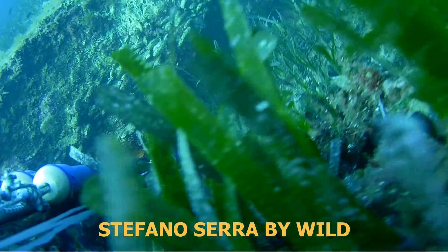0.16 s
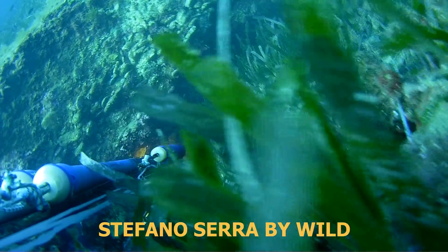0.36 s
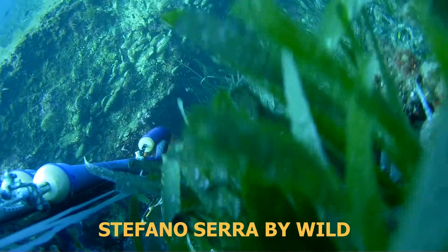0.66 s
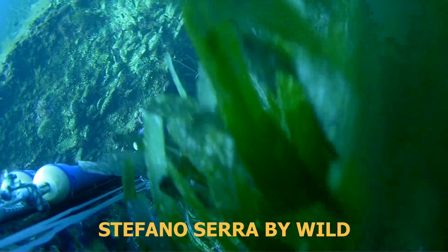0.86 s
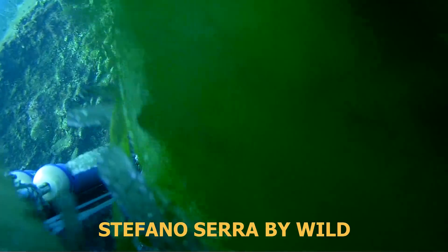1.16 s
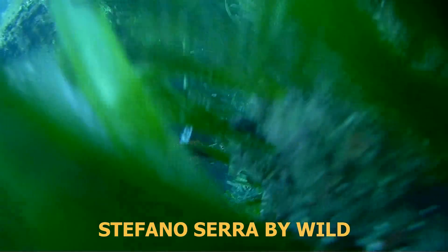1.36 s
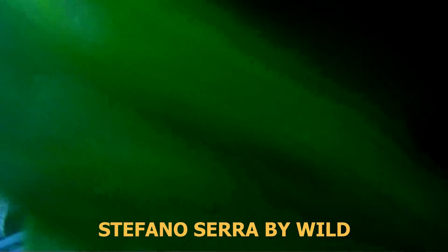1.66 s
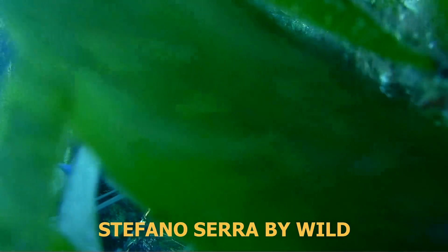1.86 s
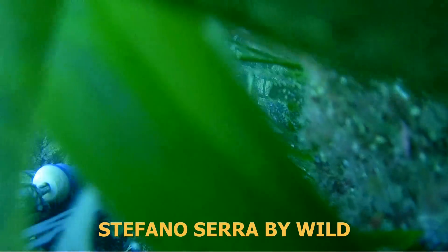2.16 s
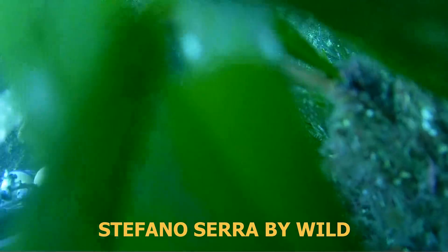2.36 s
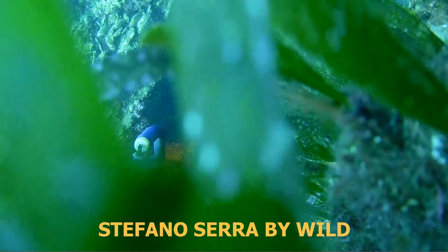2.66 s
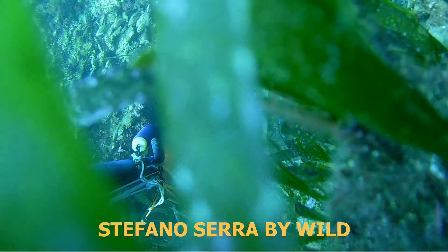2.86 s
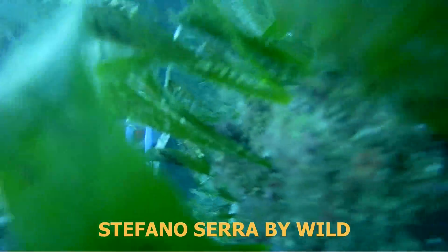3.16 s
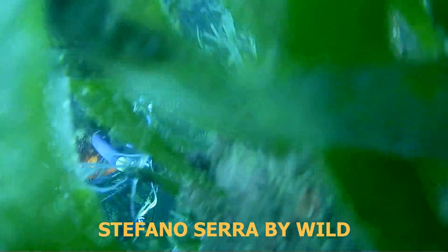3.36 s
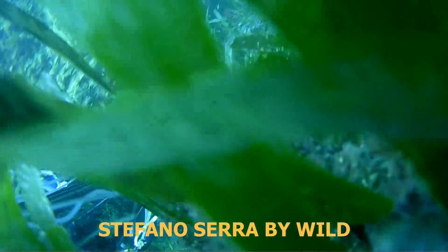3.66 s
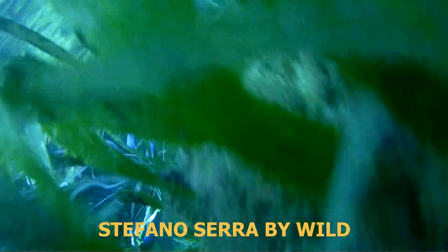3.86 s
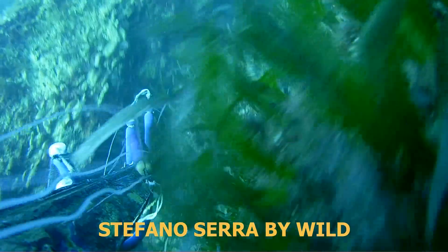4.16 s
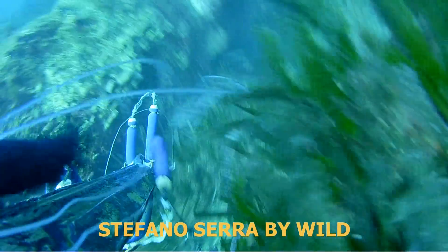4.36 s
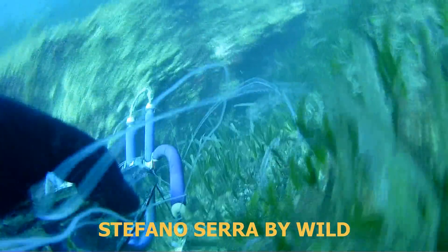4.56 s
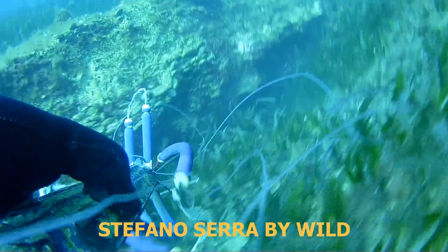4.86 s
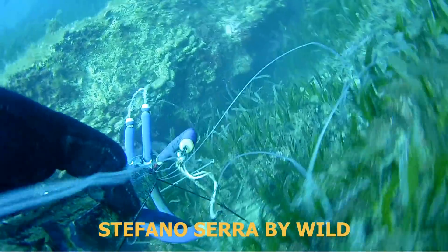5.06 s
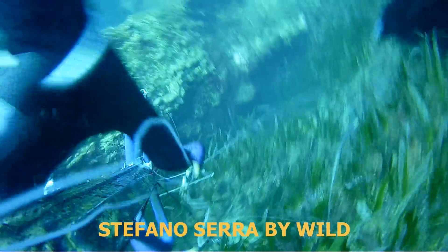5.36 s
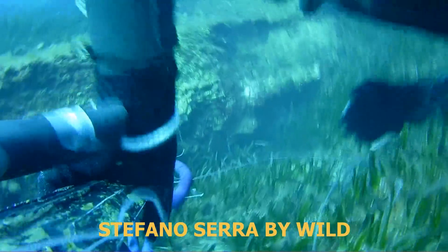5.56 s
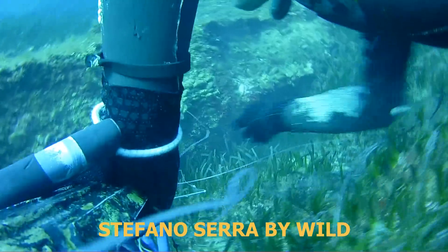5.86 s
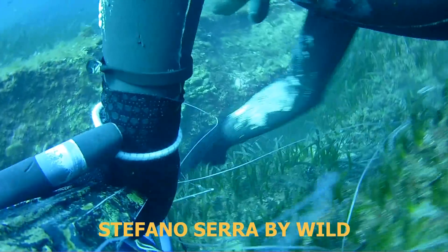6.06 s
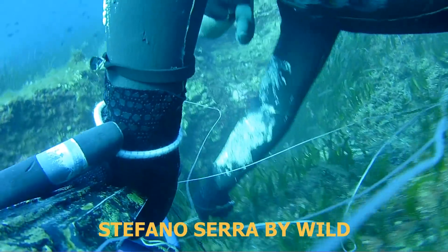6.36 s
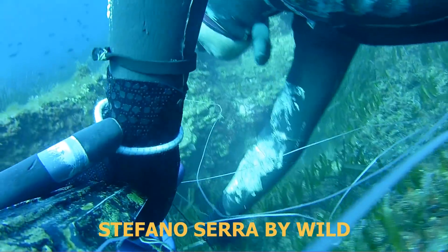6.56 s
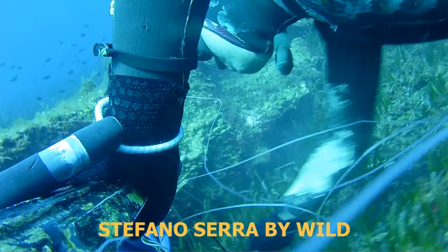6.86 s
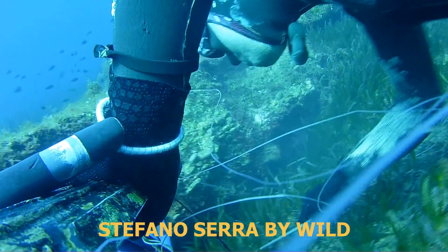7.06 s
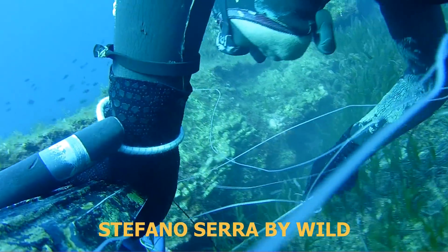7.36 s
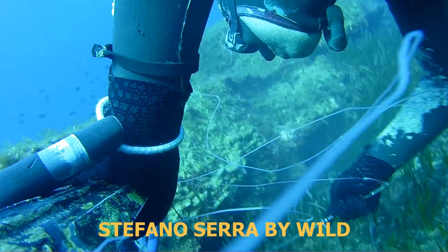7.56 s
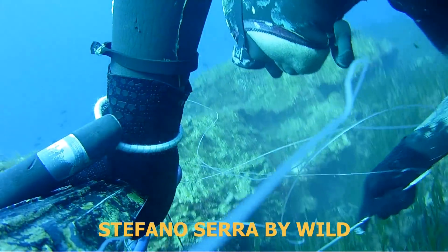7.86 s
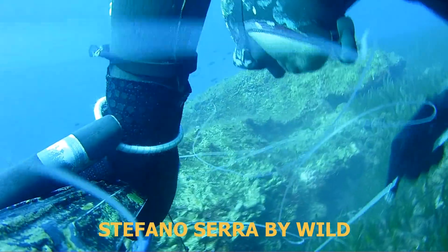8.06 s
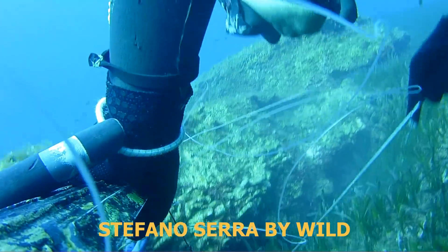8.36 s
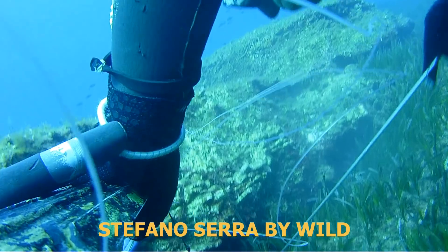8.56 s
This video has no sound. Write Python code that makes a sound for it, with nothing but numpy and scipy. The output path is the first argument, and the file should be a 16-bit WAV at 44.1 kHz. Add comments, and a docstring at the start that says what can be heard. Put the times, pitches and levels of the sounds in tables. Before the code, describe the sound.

Close, muffled, contact-like underwater sound with no room echo. Blades of grass brush and flick lightly against the housing, then near-silence before a sudden overloaded speargun crack, buzzing and metallic for a tenth of a second. Rubber bands bounce in a fading rattle. The gear is then handled with line scrapes, glove rubs, dull thuds and sharp clacks, settling into quiet hiss with sparse soft taps.

```python
"""A speargun fires under water: hard blows, a juddering scrape and recoil overload the microphone of a camera
that rides on the gun in a sealed housing. Contacts ring damped modes and excite short noise bursts; friction
is a filtered train of slips. Before the shot, seagrass rustles and flicks as the gun is pushed through it;
afterwards bands and line rattle out and the gear knocks and rubs as it is handled, over a steady hiss."""
import sys
import numpy as np
from scipy import signal
from scipy.io import wavfile

SR = 44100
rng = np.random.default_rng(int(sys.argv[2]) if len(sys.argv) > 2 else 0)


def waveform_to_disk(signal):
    """Save audio, clipped to [-1, 1], as 16-bit WAV at the path in sys.argv[1]."""
    frames = np.transpose(np.atleast_2d(signal))
    scaled = np.clip(frames, -1, 1) * 32767
    samples = np.round(scaled).astype(np.int16)
    wavfile.write(sys.argv[1], SR, samples)


N = 383669
TIME = np.arange(N) / SR

# trigger, band release and the shaft's tail leaving the muzzle: t/s, level/dB, weight/0-1, hardness/0-1
SHOT_BLOWS = [(2.9884, -3, .45, .85), (2.9906, -6.5, .4, .9), (2.9969, 2.5, .05, .82),
              (3.0027, -13, 0.3, .85), (3.112, -19.5, 0.4, .55)]
# slack bands bouncing on the gun: t/s
BAND_BOUNCES = [3.1244, 3.1284, 3.1457, 3.151, 3.1566, 3.1861, 3.1931, 3.2218, 3.269, 3.2844, 3.2903, 3.312,
                3.3212, 3.334, 3.3644, 3.4206, 3.4386, 3.5035, 3.5165, 3.6049]
# steel shaft pinging: t/s, f/Hz, level/dB, t60/s
SHAFT_PINGS = [(2.9968, 11450, -10.5, .025), (3.0025, 12000, -18.5, .012), (3.02, 5500, -7.5, .025),
               (3.2075, 5250, -37, .016)]
# shaft, line and hands hitting the gun: t/s, level/dB, weight/0-1, hardness/0-1
GEAR_KNOCKS = [(3.1639, -21.5, 0.3, 0.79), (3.2035, -35.5, .2, 1), (3.985, -42, .55, 0.2),
               (4.1046, -40, 0.7, 0.14), (4.1278, -41, 0.2, 0.92), (4.2521, -43.5, 0.55, 0.94),
               (4.479, -36, 0.35, .1), (4.5193, -37.5, 0.6, .05), (4.5488, -40, 0.93, 0.3),
               (4.6033, -24.5, 1, 0.4), (4.6052, -21, 0.43, 0.66), (4.6127, -16, 0.77, 0.64),
               (4.6293, -15.5, 0, 0.82), (4.6379, -21, 0.57, 0.6), (4.6476, -21, 0.65, 0.42),
               (4.6569, -25, 0.62, .35), (4.719, -30.5, 0.1, 0.71), (4.7261, -32, 0.46, 0.77),
               (4.7381, -40, .5, 0.88), (4.814, -28, 0.68, 0), (4.8233, -30.5, 0.46, 0.1),
               (4.8994, -37, 0, 0.1), (5.1934, -38, .35, 0), (5.3074, -47.5, 0.44, 1),
               (5.3324, -57, 0.8, 1), (5.4541, -12.5, 0.9, 0.6), (5.4574, -12, 0.92, 0.88),
               (5.4768, -14.5, .45, 0.6), (5.4839, -18.5, 0.6, 0.72), (5.5074, -30.5, 0.6, 0.3),
               (5.5666, -34, 0.3, 0.3), (5.5925, -36, 0.2, .05), (5.629, -28, 0, 0.24),
               (5.6748, -33.5, 0.67, 0), (5.6822, -31.5, 0.3, 0), (5.7067, -29, 0.63, 0),
               (5.7387, -28.5, 0, 0.36), (5.8012, -14, 0.3, 0), (5.803, -11, 0.12, 0.45),
               (5.8065, -16, 0.69, .3), (5.8291, -21, 0.47, 0.4), (5.8474, -30, 0.04, .05),
               (5.8567, -27, 0.13, .02), (5.9824, -25.5, 0.46, 0.7), (7.53, -50, .25, .35),
               (7.578, -51, .5, 1), (7.62, -53, 0.2, .8), (7.7809, -45, .5, .1), (7.8029, -38, 0.24, 0.3),
               (7.9239, -51.5, 1, 1), (7.9575, -42, .6, 0.16), (8.0571, -41, .3, 0.97),
               (8.154, -41.5, 0.4, 0.5), (8.2838, -37.5, 0.42, 0.3), (8.3671, -52.5, .5, 0.88),
               (8.664, -52, .4, 0.7)]
# low tones of heavy bumps on the gun: t/s, f/Hz, level/dB, t60/s
HEAVY_BUMPS = [(4.6035, 320, -19.5, 0.036), (4.606, 118, -23, .2), (4.657, 130, -38.5, 0.056),
               (5.4545, 306, -9.5, 0.044), (5.456, 126, -22.5, 0.14), (5.8012, 120, -27.5, 0.29),
               (5.802, 246, -25, 0.1), (5.982, 59.5, -35, 0.092)]
# glove and line rubbing along the gun: t/s, level/dB; its spectrum: f/Hz, level/dB
RUB_LEVEL = [(3.6, -64.5), (4.28, -53.5), (4.41, -62.5), (4.55, -47), (4.81, -47.5), (4.92, -60),
             (5.24, -51.5), (5.42, -58), (5.6, -45), (6.02, -53), (6.15, -61.5), (6.35, -60.5), (6.5, -75),
             (7.35, -74), (7.55, -62.5), (8.14, -58), (8.26, -73), (8.7, -57)]
RUB_SPECTRUM = [(200, -22.5), (420, -13.5), (540, -3.5), (640, -8), (740, 2), (850, -10), (1200, -17),
                (1560, -7), (1850, -16), (2300, -25), (2900, -23.5), (3280, -16), (4000, -36.5),
                (7000, -41), (15000, -61)]
# short drags of the line over the gun: middle t/s, length/s, level/dB; their spectrum: f/Hz, level/dB
LINE_DRAGS = [(3.151, 0.063, -41), (4.199, 0.038, -48.5), (4.234, 0.043, -50.5), (4.71, 0.11, -46.5),
              (5.316, 0.05, -60), (5.739, 0.0062, -31), (5.96, 0.021, -50.5), (5.984, 0.015, -49),
              (6.033, 0.036, -47), (7.64, 0.021, -53), (8.427, 0.051, -47)]
DRAG_SPECTRUM = [(400, -6.5), (780, 13.5), (1200, -6), (2000, 4), (2600, -5), (3400, 1.5), (5200, -19),
                 (7000, -11.5), (9500, -18), (15000, -25)]
# shoves that set the gun swaying in the hand: t/s, level/dB; the sway's spectrum: f/Hz, level/dB
HAND_SHOVES = [(1.44, -53), (3.02, -27), (3.12, -40), (3.185, -40), (3.31, -40), (3.41, -49),
               (4.625, -30.5), (5.35, -47), (5.475, -35), (5.82, -48), (5.99, -36.5)]
SWAY_SPECTRUM = [(15, -3), (42, 3.5), (65, -8), (115, -8.5), (190, -25), (600, -69)]
# strongest seagrass blades flicking the housing: t/s, level/dB, weight/0-1, hardness/0-1
BLADE_FLICKS = [(.9511, -44, .65, 0.6), (.995, -45.5, 0.1, 0.4), (1.11, -49, 0.6, 0.8),
                (1.14, -47, 0.4, .35), (1.2087, -48, 0.3, 0.94), (1.2702, -41, 0.4, 0.42),
                (1.3138, -45, 0.3, 0.75), (1.3493, -48, .3, .9), (1.3713, -37, 0.67, 0.95),
                (1.4019, -49, 0.68, 1), (1.4122, -38.5, 0.54, 0.87), (1.4763, -47, .55, 0.97),
                (1.5178, -41, 0.2, 0.74), (1.554, -45, .75, 0.7)]
# seagrass pressing past the housing: t/s, level/dB; its spectrum: f/Hz, level/dB
GRASS_LEVEL = [(.87, -73.5), (.97, -64.5), (1.26, -60.5), (1.39, -48), (1.45, -54.5), (1.51, -52),
               (1.62, -59), (1.76, -58.5), (2.15, -74)]
GRASS_SPECTRUM = [(300, -27), (600, -19.5), (780, 6.5), (1000, -9), (1300, -6), (1590, -3), (1850, -19),
                  (2500, -21), (3000, -11), (3800, -29), (4300, -16.5), (5400, -32), (7000, -22.5),
                  (9800, -31), (12000, -31), (16000, -54.5)]
# spectrum of the camera's hiss: f/Hz, relative level/dB
HISS_SPECTRUM = [(12, -30.5), (20, -3), (44, 0.5), (81, -2), (192, 0), (308, -2), (419, -3), (570, -5.5),
                 (620, -4.5), (819, -8.5), (916, -9.5), (1280, -13), (2960, -22.5), (13400, -33),
                 (15800, -33)]

# nominal modes of gun and housing, varied from blow to blow: f/Hz, level/dB, t60/s
HOUSING_MODES = [(40, -15, 0.56), (85.5, -8.5, 0.11), (120, -5, 0.11), (251, -6, 0.08), (320, 0, .04),
                 (523, -5.5, 0.036), (697, -1.5, 0.081), (731.7, -1.5, 0.063), (942, -11, 0.046),
                 (1180, -13, .02), (1400, -5, .025), (1543, 1, 0.031), (1649, -1, 0.025), (1925, -8, 0.023),
                 (2430, -7.5, 0.012), (2950, -6, 0.023), (3320, 0, .016), (4300, -9, 0.0069)]
# boundaries between the thud, knock, clack and snap registers: f/Hz
REGISTER_EDGES = [420, 1100, 2250]
# a light, soft blow, then what full weight and full hardness add:
# thud level/dB, knock level/dB, clack level/dB, snap level/dB, tick level/dB
LIGHT_BLOW = (-27, -8, 0, -32, -39)
ADDED_BY_WEIGHT = (22.5, 12, -7, -1.5, 0.5)
ADDED_BY_HARDNESS = (0.5, -5.5, -1.5, 30, 38.5)
# exponent of hardness for thud, knock, clack, snap and tick: the snap comes in early and the tick late
HARDNESS_EXPONENTS = (1, 1.2, 0.75, 0.46, 1.7)
# bright tick of a hard contact: f/Hz, level/dB
TICK_SPECTRUM = [(1500, -33.5), (3500, -6), (4800, -2), (5600, -10), (7300, 1.5), (8200, -9), (9300, -1.5),
                 (10800, -15), (16000, -24.5)]
# toneless crack at the start of a blow: f/Hz, level/dB
CRACK_SPECTRUM = [(200, -8.5), (1000, 0.5), (2300, 1.5), (4500, -17), (15000, -39.5)]


def shot():
    """Superposition: a volley of impacts, sliding friction of the shaft, and recoil make up the shot."""
    volley = blows(np.vstack([SHOT_BLOWS, slaps()]), ring=0.8, tick_t60=0.011, crack_db=-5.5)
    return volley + shaft_run() + recoil()


def slaps(count=9):
    """Repeated impact: the shaft slaps its track at widening gaps, each slap weaker, heavier and softer."""
    start_s, first_gap_s, gap_growth = 3.0102, 0.005, 1.188
    # sum of the geometrically growing gaps
    elapsed = first_gap_s * (gap_growth ** np.arange(count) - 1) / (gap_growth - 1)
    db, weight = np.linspace(7, 6, count), np.linspace(0.12, 0.5, count)
    hardness = np.linspace(0.68, 0.3, count)
    return np.column_stack([start_s + elapsed, db, weight, hardness])


def shaft_run(waver=0.04, scrape_db=-14, grip_db=4):
    """Frequency modulation and friction: the judder swells, holds and stops while its pitch sags."""
    start_s, full_s, end_s = SHOT_BLOWS[0][0], 3.046, 3.105
    envelope = (TIME > start_s) * swell(full_s, end_s, db=-2.5, rise=450.5, fall=2500)
    # 690 Hz at full swell, sagging by 560 Hz per second, with a random waver
    hz = 690 - 560 * (np.clip(TIME, start_s, end_s) - full_s)
    turns = np.cumsum(hz * (1 + waver * wander(120))) / SR
    grip = evened(gain_of(grip_db * wander(98)))  # the shaft bears unevenly on the track
    judder = np.sqrt(2) * grip * np.sin(2 * np.pi * turns)
    scrape = gain_of(scrape_db) * coloured(slips(2600, 6.2), DRAG_SPECTRUM)
    return envelope * (judder + scrape)


def recoil(level_db=-1):
    """Reaction and exponential decay: the gun kicks back and churns the water, heard as low noise."""
    age = np.maximum(TIME - SHOT_BLOWS[0][0], 0)
    surge = 0.053 * (age > 0) * np.exp(-age / 0.066)  # time constant in s
    return gain_of(level_db) * surge * evened(band(wander(100), 33, "high"))


def rattle():
    """Loss of energy in repeated impact: the slack bands bounce ever weaker and softer."""
    first_db, fall_db_per_s = -22, 38
    weight, first_hardness, soften_s = 0.42, 0.2, 0.18
    rows = []
    for s in BAND_BOUNCES:
        age = s - BAND_BOUNCES[0]
        hardness = first_hardness * np.exp(-age / soften_s)
        rows.append((s, first_db - fall_db_per_s * age, weight, hardness))
    return blows(rows, ring=0.87, tick_t60=0.006, detune=0.059, crack_db=-6.5)


def line_out(spread_db=5.5, dull_hz=2700):
    """Sliding friction: the line whips out after the shaft and slithers to rest."""
    envelope = swell(3.09, 3.09, db=-32, rise=260, fall=65.5)
    slither = coloured(slips(700, spread_db), RUB_SPECTRUM)
    return envelope * band(slither, dull_hz, "low")


def rings(rows):
    """Free damped oscillation: single dying tones for the pings of steel and the hum of heavy bumps."""
    out, t = np.zeros(N), np.arange(SR // 5) / SR
    for s, hz, db, t60 in rows:
        add(out, s, gain_of(db) * decay(t, t60) * np.sin(2 * np.pi * hz * t))
    return out


def knocks():
    """Impact excitation: gear hits the gun, with small chance blows during the rubbing."""
    small = scatter(RUB_LEVEL, above_db=2.5, spread_db=6, weight=0.35, hardness=0.15, count=110)
    return blows(np.vstack([GEAR_KNOCKS, small]), ring=0.85, tick_t60=0.0056, crack_db=-9)


def rub(level_db=-1, spread_db=4.3):
    """Sliding friction: glove and line rub along the gun."""
    return gain_of(level_db) * level(RUB_LEVEL) * coloured(slips(1300, spread_db), RUB_SPECTRUM)


def drags(spread_db=4.0):
    """Sliding friction in short spells: each pull of the line swells and fades under a smooth window."""
    pull = np.zeros(N)
    for middle, length, db in LINE_DRAGS:
        add(pull, middle - length / 2, gain_of(db) * np.hanning(round(length * SR)))
    return coloured(pull * slips(2800, spread_db), DRAG_SPECTRUM)


def sway():
    """Amplitude modulation: each shove raises and releases a low noise as the gun sways in the hand."""
    swing = sum(swell(s, s, db, rise=520.5, fall=200.5) for s, db in HAND_SHOVES)
    return swing * coloured(rng.standard_normal(N), SWAY_SPECTRUM)


def seagrass(body_db=-2, fizz_db=-10, flick_db=0.5):
    """Friction and impact: rough blades drag over the housing and flick free."""
    rustle = coloured(slips(900, 4.0), GRASS_SPECTRUM)
    body = gain_of(body_db) * evened(band(rustle, 2500, "low", order=4))
    fizz = gain_of(fizz_db) * evened(band(rustle, 2300, "high", order=4))
    small = scatter(GRASS_LEVEL, above_db=2.0, spread_db=10.5, weight=0.47, hardness=0.7, count=34)
    flicks = blows(np.vstack([BLADE_FLICKS, small]), ring=0.72, tick_t60=0.01)
    return level(GRASS_LEVEL) * (body + fizz) + gain_of(flick_db) * flicks


def hiss(level_db=-57):
    """Stationary filtered noise: the dull, even hiss of the camera itself."""
    return gain_of(level_db) * coloured(rng.standard_normal(N), HISS_SPECTRUM)


def blows(rows, ring, tick_t60, detune=0.04, uneven_db=3.5, contact_hz=4600, crack_db=-10, crack_t60=0.02):
    """Modal superposition: each blow rings the modes, its weight and hardness setting each register's share."""
    hz, db, t60 = np.transpose(HOUSING_MODES)
    register = np.searchsorted(REGISTER_EDGES, hz)
    t = np.arange(SR // 4) / SR
    sign = (-1) ** np.arange(len(hz))  # neighbouring modes push the wall in opposite directions
    dying = decay(t, ring * t60[:, None])
    body, ticks, cracks = np.zeros((3, N))
    for s, *force_db, tick_db in contacts(rows):
        chance_db = uneven_db * rng.standard_normal(len(hz))
        size = sign * gain_of(db + np.array(force_db)[register] + chance_db)
        blow_hz = hz * (1 + detune * rng.standard_normal(len(hz)))
        swing = np.sin(2 * np.pi * np.outer(blow_hz, t))
        add(body, s, size @ (swing * dying))
        add(ticks, s, gain_of(tick_db) * decay(t, tick_t60))
        add(cracks, s, gain_of(crack_db + np.mean(force_db[1:])) * decay(t, crack_t60))
    cushioned = band(body, contact_hz, "low", order=4)  # water softens each contact
    tick_noise = coloured(ticks * rng.standard_normal(N), TICK_SPECTRUM)
    crack_noise = coloured(cracks * rng.standard_normal(N), CRACK_SPECTRUM)
    return cushioned + tick_noise + crack_noise


def contacts(rows):
    """Contact spectrum: weight favours the low registers; hardness brings out snap and tick."""
    s, db, weight, hardness = np.array(rows).T[:, :, None]
    edge = np.clip(hardness, 0, 1) ** np.array(HARDNESS_EXPONENTS)
    from_weight = weight * np.array(ADDED_BY_WEIGHT)
    from_hardness = edge * np.array(ADDED_BY_HARDNESS)
    return np.hstack([s, db + np.array(LIGHT_BLOW) + from_weight + from_hardness])


def scatter(curve, above_db, spread_db, weight, hardness, count):
    """Random impacts: one small blow in each equal slice of a movement, its level following the movement."""
    times, db = np.transpose(curve)
    when, size, heavy, hard = rng.random((count, 4)).T
    s = times[0] + (times[-1] - times[0]) * (np.arange(count) + when) / count
    blow_db = np.interp(s, times, db) + above_db + spread_db * (size - 0.5)
    return np.column_stack([s, blow_db, 2 * weight * heavy, hardness * (0.5 + hard)])


def slips(per_s, spread_db):
    """Stick-slip friction: a random train of tiny slips, most small and a few large, at rms 1."""
    size = gain_of(spread_db * np.minimum(rng.exponential(1, N), 4))
    happens = rng.random(N) < per_s / SR
    return evened(size * rng.choice([-1, 1], N) * happens)


def swell(full_s, end_s, db, rise, fall):
    """Exponential growth and decay: holds db from full_s to end_s; rise and fall in dB per second."""
    before, after = np.maximum(full_s - TIME, 0), np.maximum(TIME - end_s, 0)
    return gain_of(np.maximum(db - rise * before - fall * after, -200))


def decay(t, t60):
    """Exponential damping: amplitude falls by 60 dB in t60 seconds."""
    return np.exp(-np.log(1000) * t / t60)


def wander(hz):
    """Low-passed random fluctuation of rms 1."""
    return evened(band(rng.standard_normal(N), hz, "low"))


def coloured(x, points, size=4096):
    """Minimum-phase filtering: a causal filter of unit energy imposes the given spectrum."""
    hz, db = np.transpose(points)
    bins = abs(np.fft.fftfreq(size, 1 / SR)) + 1  # 1 Hz offset keeps the logarithm finite
    log_gain = np.log(gain_of(np.interp(np.log(bins), np.log(hz), db)))
    # the Hilbert transform of the log gain gives the phase
    response = np.exp(np.conj(signal.hilbert(log_gain)))
    taps = np.fft.ifft(response).real[:size // 2]
    return signal.oaconvolve(x, taps / np.linalg.norm(taps))[:len(x)]


def band(x, hz, kind, order=2):
    """Butterworth filtering: low-pass or high-pass."""
    return signal.sosfilt(signal.butter(order, hz, kind, fs=SR, output="sos"), x)


def level(rows):
    """Amplitude envelope: follows a dB curve, practically silent outside it."""
    return gain_of(np.interp(TIME, *np.transpose(rows), left=-150, right=-150))


def gain_of(db):
    """Logarithmic level: decibels to amplitude."""
    return 10 ** (np.asarray(db) / 20)


def evened(x):
    """Normalisation of power: scales to rms 1."""
    return x / np.sqrt(np.mean(x ** 2) + 1e-20)


def add(mix, s, sound):
    """Linear superposition: mixes a sound in at time s."""
    part = mix[round(s * SR):][:len(sound)]
    part += sound[:len(part)]


def scene():
    """Common transmission path: all sound arrives through the housing, so both channels are alike."""
    firing = shot() + rattle() + line_out() + rings(SHAFT_PINGS)
    handling = knocks() + rings(HEAVY_BUMPS) + rub() + drags() + sway()
    sound = firing + handling + seagrass()
    return np.array([sound, sound])


def record(dry, ceiling=0.3, knee=9, rolloff_hz=12500, edge_hz=15900):
    """Saturation and band limiting: the input overloads, then come gentle roll-off, hiss and a steep cut."""
    clipped = dry / (1 + abs(dry / ceiling) ** knee) ** (1 / knee)
    without_rumble = band(clipped, 15, "high", order=1)
    mellow = band(without_rumble, rolloff_hz, "low", order=1)
    steep_cut = signal.firwin(301, edge_hz, window=("kaiser", 8), fs=SR)
    return signal.oaconvolve(mellow + hiss(), steep_cut[None], "same")


dry = scene()
out = record(dry)
waveform_to_disk(out)
```